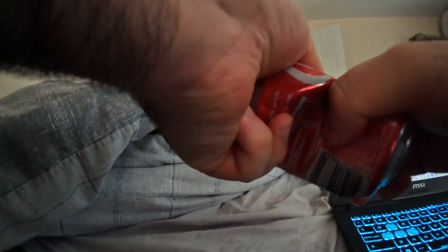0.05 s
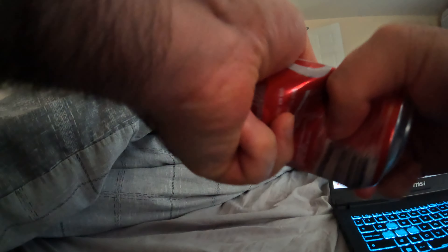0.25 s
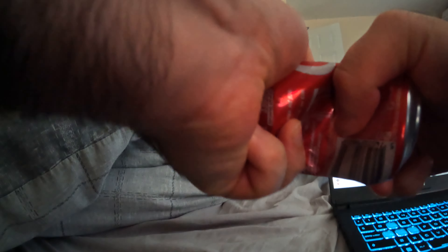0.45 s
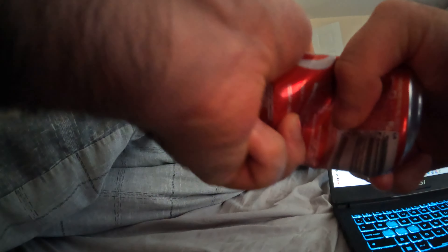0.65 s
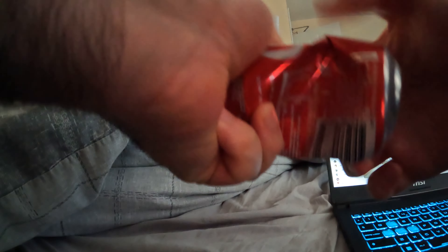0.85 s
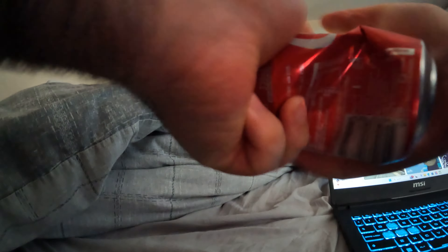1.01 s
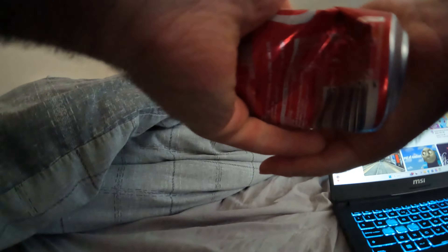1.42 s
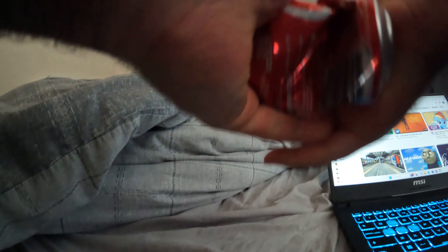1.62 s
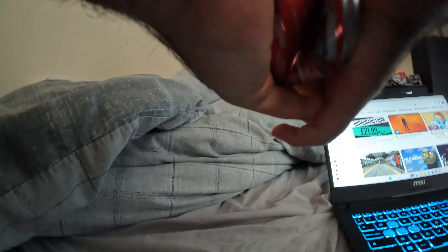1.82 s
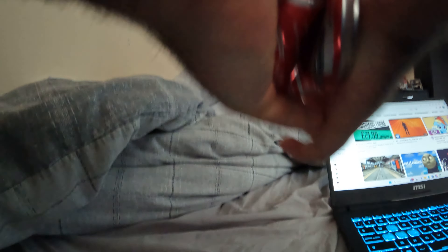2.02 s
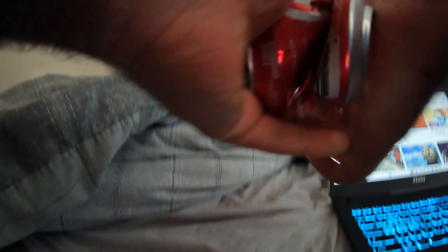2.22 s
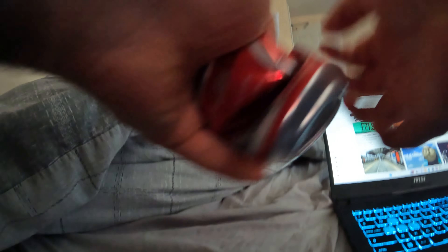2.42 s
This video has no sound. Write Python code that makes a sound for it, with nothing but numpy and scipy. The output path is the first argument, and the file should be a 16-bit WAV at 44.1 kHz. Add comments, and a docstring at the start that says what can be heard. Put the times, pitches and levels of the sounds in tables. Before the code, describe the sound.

A thin metal can crushed by hand, with irregular sharp pops and crackles.

```python
"""A thin aluminium can buckles in sharp pops as two hands crush it close to the microphone.
Each pop excites new resonances, since the shape has changed, and the grip damps most of them at once.
Creases crackle between the pops and the hollow body thuds. Skin rubs on the metal by stick-slip
friction, the hands rumble, and a quiet room adds faint reverberation."""
import sys
import numpy as np
from scipy import signal
from scipy.fft import rfft, irfft
from scipy.io import wavfile

SR = 44100
rng = np.random.default_rng(int(sys.argv[2]) if len(sys.argv) > 2 else 0)


def log_audio(samples):
    """Write samples as a 16-bit WAV file to the path given in sys.argv[1]."""
    # one column per channel
    frames = np.atleast_2d(samples).T
    # limit to full scale, then quantise
    limited = np.clip(frames, -1, 1)
    pcm = np.round(limited * 32767).astype(np.int16)
    wavfile.write(sys.argv[1], SR, pcm)


N = 112454
TIME = np.arange(N) / SR
BRIEF = TIME[:SR // 3]

# Table levels are relative; t60 is the time of a 60 dB decay.
# Spectra of the background noise and of the reverberation: f/Hz, level/dB
AMBIENT_SPECTRUM = [(30, 0), (100, -20.5), (250, -11.5), (500, -22.5), (1000, -19.5), (1600, -19.5),
                    (3000, -36), (7000, -44), (16000, -56)]
REVERB_SPECTRUM = [(150, -20), (500, 0.5), (1100, 0), (2500, -1), (4500, -7), (8000, 0.5), (15000, 1)]
# Phase lag of the left channel behind the right: f/Hz, phase/rad
LEFT_PHASE_LAG = [(100, 0), (950, .1), (1640, .38), (3600, .55), (8000, .5), (15000, .7)]
# Envelopes of hand rumble, body hum, and mid and treble rubbing: t/s, level/dB
RUMBLE_LEVELS = [(0.0, -57), (0.25, -54.5), (0.75, -49.5), (1.08, -57), (1.23, -53.5), (1.46, -54.5),
                 (1.7, -52.5), (1.95, -58.5), (2.33, -49), (2.55, -61.5)]
HUM_LEVELS = [(0.0, -65.5), (0.13, -61.5), (0.52, -63), (0.78, -59), (0.91, -55), (1.05, -71.5),
              (1.19, -74), (1.63, -63), (1.97, -68), (2.55, -66)]
MID_RUB_LEVELS = [(0,-53.5), (.08,-63), (.19,-59), (.3,-58), (.39,-57), (.58,-64.5), (.65,-57.5), (.75,-53),
                  (.83,-53), (.9,-45), (.96,-55), (1.07,-54.5), (1.16,-51), (1.22,-42.5), (1.29,-51),
                  (1.4,-62), (1.53,-55.5), (1.63,-39.5), (1.71,-61), (1.82,-43.5), (1.91,-61), (2.11,-71),
                  (2.22,-56.5), (2.45,-64), (2.55,-57)]
HIGH_RUB_LEVELS = [(.01,-59), (.1,-71), (.2,-67.5), (.35,-68), (.44,-83.5), (.7,-68.5), (.77,-51), (.9,-56),
                   (.97,-62.5), (1.07,-78), (1.11,-63.5), (1.22,-60), (1.28,-66.5), (1.41,-77.5),
                   (1.53,-73), (1.62,-52.5), (1.72,-74.5), (1.8,-56), (1.91,-75), (2.11,-91), (2.17,-65),
                   (2.29,-66), (2.43,-74), (2.55,-64.5)]
# Spectra of the same four noises: f/Hz, level/dB
HAND_SPECTRUM = [(15, 2), (25, 5), (40, 0.5), (60, -8.5), (90, -18), (150, -26), (400, -49.5),
                 (1500, -92.5)]
HUM_SPECTRUM = [(70, -49.5), (140, -10), (210, -4), (290, -6.5), (400, -17.5), (600, -21), (1200, -16.5),
                (5000, -60.5)]
MID_RUB_SPECTRUM = [(500, -20.5), (750, -19.5), (1000, 10.5), (1500, 16), (2300, 15), (3200, -17.5),
                    (4500, -23.5), (8000, -53)]
HIGH_RUB_SPECTRUM = [(1500, -33.5), (2600, 4.5), (3600, 7), (5200, 1.5), (7000, -4), (9500, -15.5),
                     (13000, -13.5), (16000, -25.5)]
# Low bumps of the hands and short thuds of the can at loud pops: t/s, level/dB, f/Hz, t60/s
BUMPS = [(.664, -26, 36, 0.092), (0.974, -28.5, 55, 0.077), (1.096, -35, 34, 0.32),
         (1.247, -21, 290.5, 0.013), (1.612, -28, 29.7, 0.22), (1.613, -33, 95, 0.079),
         (1.757, -37, 44.45, 0.084), (2.257, -18, 94.8, 0.015)]
# Thuds of the hollow body: t/s, level/dB, f/Hz, t60/s
BODY_THUDS = [(0.109, -47.5, 220, 0.075), (0.207, -47, 230, 0.04), (0.216, -38, 198, 0.029),
              (0.231, -33, 182, 0.053), (0.369, -39.5, 202, 0.033), (0.409, -34, 206, 0.06),
              (0.474, -35.5, 202, 0.042), (0.51, -38, 196, 0.084), (0.57, -41.5, 232, 0.072),
              (0.633, -32.5, 295, 0.04), (0.818, -30.5, 208, 0.04), (0.87, -36, 184, 0.043),
              (0.923, -30, 188, 0.037), (0.972, -46, 162, 0.072), (0.987, -28.5, 205, 0.036),
              (1.095, -28.5, 180, 0.02), (1.145, -42, 216, 0.051), (1.178, -40.5, 206, 0.081),
              (1.593, -41.5, 182, 0.051), (1.731, -38.5, 264, 0.04), (1.768, -38, 276, 0.048),
              (1.827, -44.5, 324, 0.039), (1.933, -47, 308, 0.06), (2.26, -38, 308, 0.026)]
# Low, middle and high bands of a crackle: lower f/Hz, upper f/Hz
CREASE_BANDS = [(950, 1700), (1700, 3800), (3800, 8500)]
# Yielding creases: t/s, level/dB in each of the three bands, t60/s
CREASES = [(.372,-59,-56,-63,0.018), (.4735,-48.5,-86,-65,0.011), (.501,-57,-57,-72,0.01),
           (.512,-52.5,-61,-63.5,0.023), (.571,-54,-72,-62,0.0099), (.626,-43.5,-60,-70,0.1),
           (.662,-47,-57,-70,0.018), (.787,-32,-36.5,-44,0.031), (.8,-36,-36,-46,0.019),
           (.848,-44,-38,-45,0.053), (.853,-40,-46,-45.5,.03), (.897,-42.5,-42.5,-46.5,0.033),
           (.91,-39,-31.5,-39,0.11), (1.095,-36,-36,-40.5,0.044), (1.139,-36,-41.5,-53,0.057),
           (1.177,-46.5,-47.5,-53,0.058), (1.197,-44,-44,-57,0.059), (1.213,-43.5,-44,-48,0.022),
           (1.238,-56.5,-38,-58,.03), (1.414,-55.5,-57.5,-74,.025), (1.427,-50,-62,-78.5,.025),
           (1.455,-53,-69.5,-74,0.024), (1.468,-69.5,-54.5,-72,0.029), (1.476,-46,-47.5,-67,0.0067),
           (1.589,-43,-42,-56,0.034), (1.612,-34,-32,-53,0.057), (1.629,-41.5,-30,-38.5,0.021),
           (1.761,-37,-31.5,-46,0.073), (1.809,-46,-36.5,-58,0.065), (1.828,-46,-43,-64,0.023),
           (1.886,-66,-54,-74,0.023), (2.17,-58,-55,-74,0.034), (2.238,-56.5,-49.5,-66,.03),
           (2.2487,-37,-38,-52,0.081), (2.363,-48,-41.5,-51.5,0.037), (2.533,-70,-53,-67,0.043)]
# Extra tones of the can wall, some brief, some ringing on: t/s, f/Hz, level/dB, t60/s
WALL_TONES = [(.636, 1750, -18, 0.018), (0.638, 1088, -39.5, 0.13), (.811, 939, -26, 0.058),
              (0.99, 908, -33, 0.12), (.989, 1640, -37.5, 0.12), (1.148, 888, -26.5, .09),
              (1.148, 1450, -35.5, 0.11), (1.247, 2230, -25, 0.084), (1.414, 2220, -41.5, 0.037),
              (1.457, 1000, -37.5, .05), (2.258, 1480, -37.5, 0.35), (2.26, 1540, -42, 0.33)]
# Buckles of the wall: t/s, t60/s, five modes as (f/Hz, level/dB), crack level/dB, air push level/dB,
# then, relative to each mode, neighbouring modes' level/dB and level/dB shed into the room
BUCKLES = [(0.1111, 0.012, 1090, -45, 1410, -41, 2330, -40, 2860, -40, 4350, -49.5, -87, -41, -3, -14.5),
           (0.2068, 0.007, 1120, -44, 1590, -41, 2220, -36, 2670, -47, 5070, -53, -66, -36, -3.5, -26),
           (0.2163, 0.015, 1070, -40.5, 1650, -31, 1874, -33, 2690, -40.5, 4100, -50, -67, -41, -4, -23),
           (0.2336, 0.004, 930, -38, 1650, -26, 2376, -19, 2835, -22.5, 4560, -29.5, -44, -36, -9.5, -19.5),
           (0.4107, 0.01, 1100, -30, 1486, -32.5, 1885, -34.5, 3080, -38, 5040, -59, -69, -37, -4, -18),
           (0.6358, 0.0078, 1020, -21, 1444, -23, 1710, -47, 3460, -45.5, 4280, -51.5, -58, -22.5, -16, -23),
           (0.7221, 0.0045, 1170, -49.5, 1310, -25.5, 1765, -30.5, 3670, -27, 4510, -34, -29, -54, -10, -23),
           (0.811, 0.018, 880, -34, 1510, -44, 2110, -44, 2800, -50, 4500, -68.5, -62, -39, -18, -26.5),
           (0.8203, 0.0097, 990, -36, 1330, -52, 2140, -36.5, 2900, -55.5, 6200, -62, -68, -28.5, -13, -18),
           (0.9254, 0.013, 1080, -28, 1470, -24.5, 2154, -14, 3056, -19, 5250, -25.5, -27, -59.5, -10.5, -35),
           (0.9889, 0.011, 826, -49, 1484, -39.5, 2050, -39.5, 2985, -32, 4130, -44, -64, -42, -5.5, -14.5),
           (0.9919, 0.028, 887, -41, 1610, -39.5, 1860, -39.5, 3210, -40.5, 5390, -47.5, -80, -34.5, -2, -17),
           (1.1475, 0.017, 855, -21.5, 1400, -39.5, 2210, -34.5, 3250, -51, 4180, -44, -55, -36, -5.5, -20.5),
           (1.247, 0.011, 1097, -24, 1300, -22.5, 2084, -15.5, 3030, -24, 4970, -30.5, -37, -46.5, -3.5, -32.5),
           (1.5623, 0.011, 1110, -40.5, 1148, -28, 2040, -35, 3000, -24.5, 5310, -26.5, -37, -64.5, -8.5, -21),
           (1.5965, 0.013, 935, -30.5, 1550, -25, 1830, -24, 3230, -28, 6430, -32.5, -40.5, -41, 0.5, -23.5),
           (1.7322, 0.011, 1108, -27, 1360, -32.5, 1880, -54.5, 2830, -72.5, 5010, -84, -81, -37.5, -11, -22),
           (1.7679, 0.0059, 1125, -37.5, 1508, -25.5, 2470, -23, 2955, -25, 5430, -26.5, -37.5, -53.5, -2.5, -23),
           (1.935, 0.022, 870, -45, 1558, -32.5, 2320, -29, 2695, -35, 4490, -38.5, -56.5, -42, -1.5, -17),
           (2.2598, 0.014, 1250, -35.5, 1484, -15, 2387, -28, 2900, -22.5, 4945, -18, -32.5, -36, -10.5, -23.5)]


def amp(db):
    """Amplitude ratio of a level in decibels."""
    return 10 ** (np.asarray(db) / 20)


def unit(x):
    """Normalisation to rms 1."""
    return x / np.sqrt(np.mean(x ** 2) + 1e-20)


def transient(x, db):
    """Energy normalisation: db is the rms level if all the energy fell within 10 ms."""
    return amp(db) * x * np.sqrt((SR // 100) / (np.sum(x ** 2) + 1e-20))


def add(out, onset_s, x):
    """Superposition of a sound from its onset."""
    i = max(int(onset_s * SR), 0)
    out[i:i + len(x)] += x[:N - i]


def envelope(attack_s, t60, t=BRIEF):
    """Exponential decay after a rounded rise."""
    return (1 - np.exp(-t / attack_s)) ** 2 * np.exp(-np.minimum(np.log(1000) * t / t60, 100))


def mode(hz, attack_s, t60):
    """A damped oscillator starting from rest."""
    return envelope(attack_s, t60) * np.sin(2 * np.pi * hz * BRIEF)


def filtered(x, hz, kind="band"):
    """Causal filtering with a maximally flat passband."""
    return signal.sosfilt(signal.butter(2, hz, kind, fs=SR, output="sos"), x)


def colour(x, spectrum):
    """Spectral shaping, interpolated in log frequency."""
    hz, db = np.transpose(spectrum)
    f = np.maximum(np.fft.rfftfreq(N, 1 / SR), 1)
    return irfft(rfft(x) * amp(np.interp(np.log(f), np.log(hz), db)), N)


def grains(spread_db, size):
    """Random amplitude modulation: noise whose level jumps about every millisecond."""
    step = SR // 1000
    noise = rng.standard_normal(size)
    jumps = np.repeat(rng.standard_normal(size // step + 1), step)[:size]
    return noise * amp(spread_db * jumps)


def place(x, pan_db=3.8):
    """Phase and level cues put the can a little to the right."""
    lag = np.interp(np.fft.rfftfreq(N, 1 / SR), *np.transpose(LEFT_PHASE_LAG))
    left = irfft(rfft(x) * np.exp(-1j * lag), N)
    return np.array([amp(-pan_db / 2) * left, amp(pan_db / 2) * x])


def ambience(db=-76.5):
    """Stationary background noise, uncorrelated between the channels."""
    return amp(db) * unit(colour(rng.standard_normal((2, N)), AMBIENT_SPECTRUM))


def room(x):
    """Diffuse reverberation: convolution with decaying noise of unit energy."""
    tails = colour(rng.standard_normal((2, N)), REVERB_SPECTRUM)
    tails *= envelope(attack_s=0.0013, t60=0.36, t=TIME)
    tails /= np.sqrt(np.sum(tails ** 2, axis=1, keepdims=True))
    middle, side = signal.fftconvolve(x[None], tails, axes=1)[:, :N]
    return place(middle) + 0.4 * side * [[1], [-1]]


def friction(levels, spectrum, grain_db=0):
    """Sliding contact radiates coloured noise, here following a level curve."""
    middle, side = (unit(colour(grains(grain_db, N), spectrum)) for _ in range(2))
    gain = amp(np.interp(TIME, *np.transpose(levels)))
    return gain * (place(middle) + 0.2 * side * [[1], [-1]])


def handling():
    """Structure-borne noise: the hands rumble and the hollow body hums."""
    rumble = amp(-0.5) * friction(RUMBLE_LEVELS, HAND_SPECTRUM)
    hum = amp(5) * friction(HUM_LEVELS, HUM_SPECTRUM)
    return rumble + hum


def skin_rub(levels, spectrum, clump_db=3, clump_s=0.005):
    """Stick-slip friction: skin drags over the metal in short, uneven scrapes."""
    knots = np.arange(0, N / SR + 0.1, clump_s)
    clumps = np.interp(TIME, knots, rng.standard_normal(2000)[:len(knots)])
    return amp(clump_db * clumps) * friction(levels, spectrum, grain_db=0.5)


def jolts(events, attack_s, gain_db=0):
    """Impulse excitation: each jolt of the body or hands starts one low, damped oscillation."""
    out = np.zeros(N)
    for onset, db, hz, t60 in events:
        add(out, onset, amp(db + gain_db) * mode(hz, attack_s, t60))
    return out


def crackles(gain_db=-2):
    """Stress release: a crease gives way in a quick, dying run of tiny slips."""
    out = np.zeros(N)
    for onset, *levels, t60 in CREASES:
        slips = grains(spread_db=4.5, size=len(BRIEF)) * envelope(0.0001, t60)
        for edges_hz, db in zip(CREASE_BANDS, levels):
            add(out, onset, transient(filtered(slips, edges_hz), db + gain_db))
    return filtered(out, hz=7500, kind="low")


def wall_tones():
    """Damped resonance: extra tones of the can wall, mostly at the pops, some brief, some ringing on."""
    out = np.zeros(N)
    for onset, hz, db, t60 in WALL_TONES:
        add(out, onset, amp(db) * mode(hz, attack_s=0.00057, t60=t60))
    return out


def neighbouring_modes(hz, log_spread=0.256, attack_cycles=0.3):
    """A thin shell has high modal density: six modes of random sign cluster around a resonance."""
    offsets = np.linspace(-1, 1, 6) + rng.normal(0, 0.11, size=6)
    cluster_hz = hz * np.exp(log_spread * offsets)
    return sum(rng.choice([-1, 1]) * mode(f, attack_cycles / f, t60=0.017) for f in cluster_hz)


def pops(attack_cycles=0.15, scatter_ratio=1.11):
    """Snap-through buckling: a crack, damped modes and a push of air. Returns direct and shed sound."""
    direct, shed = np.zeros((2, N))
    impulse = signal.unit_impulse(len(BRIEF))
    for onset, t60, *modes, crack_db, push_db, neighbour_db, room_db in BUCKLES:
        burst = rng.standard_normal(len(BRIEF)) * envelope(attack_s=0.0001, t60=0.0095)
        snap = transient(filtered(burst, hz=(5500, 9000)), crack_db - 0.5)
        for k, (hz, db) in enumerate(zip(modes[::2], modes[1::2])):
            snap += (-1) ** k * transient(mode(hz, attack_cycles / hz, t60), db + 0.5)
            snap += transient(neighbouring_modes(hz), db + neighbour_db)
            # The far side of the can sheds a broader band around each resonance into the room.
            scatter = filtered(impulse, (hz / scatter_ratio, hz * scatter_ratio))
            add(shed, onset, transient(scatter, db + room_db))
        snap = filtered(snap, hz=1070, kind="high")  # small panels radiate little bass
        push = transient(mode(hz=389, attack_s=0.0018, t60=0.0028), push_db - 5.5)
        add(direct, onset, snap + push)
    return direct, shed


def scene():
    """Superposition of the can's direct sound, the hands' contact noise and the room."""
    buckles, shed = pops()
    creases = crackles()
    thuds = jolts(BODY_THUDS, attack_s=0.002, gain_db=8.5)
    bumps = jolts(BUMPS, attack_s=0.0034)
    direct = place(buckles + wall_tones() + creases + thuds + bumps)
    rub = amp(-5) * skin_rub(MID_RUB_LEVELS, MID_RUB_SPECTRUM)
    rub += amp(2) * skin_rub(HIGH_RUB_LEVELS, HIGH_RUB_SPECTRUM)
    return direct + rub + handling() + ambience() + room(shed + amp(-22.5) * creases)


def record(dry, overload=0.92):
    """Band and amplitude limiting: a gentle treble loss, clipping at overload, a steep treble cut."""
    softened = filtered(dry, hz=11400, kind="low")
    clipped = np.clip(softened, -overload, overload)
    treble_cut = signal.firwin(61, 15500, fs=SR)
    return signal.fftconvolve(clipped, treble_cut[None], mode="same", axes=1)


dry = scene()
out = record(dry)
log_audio(out)
```